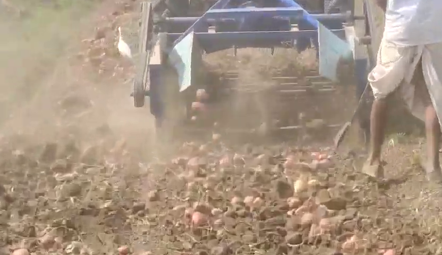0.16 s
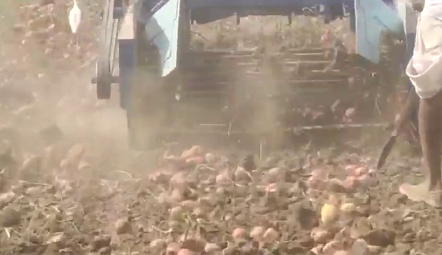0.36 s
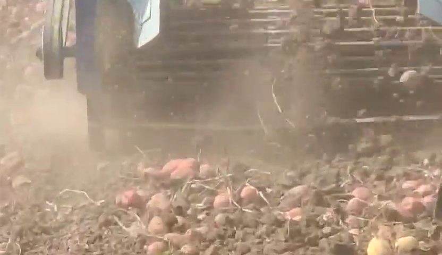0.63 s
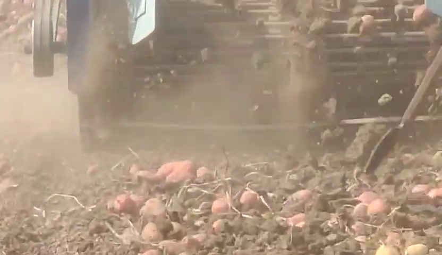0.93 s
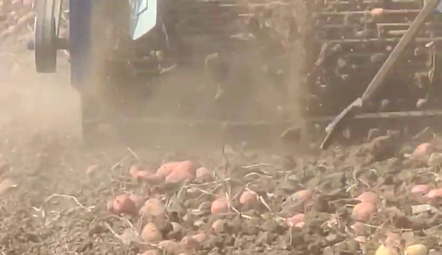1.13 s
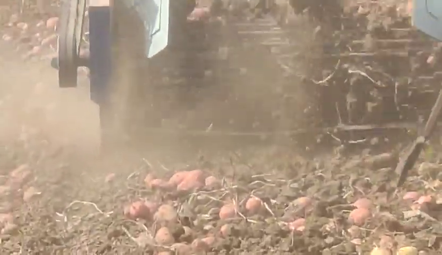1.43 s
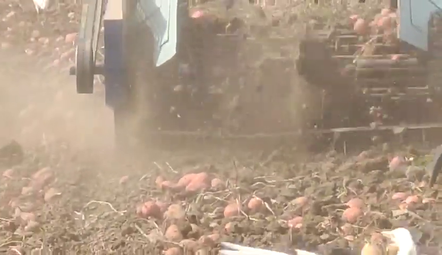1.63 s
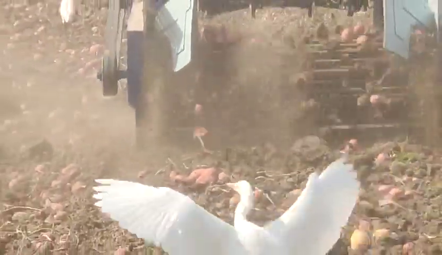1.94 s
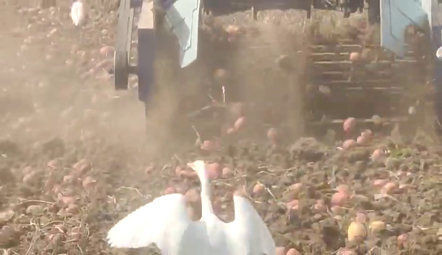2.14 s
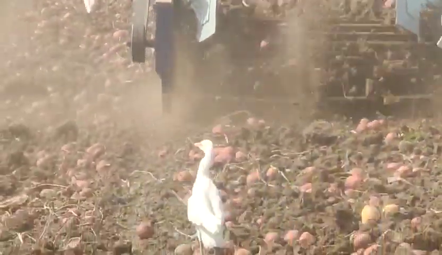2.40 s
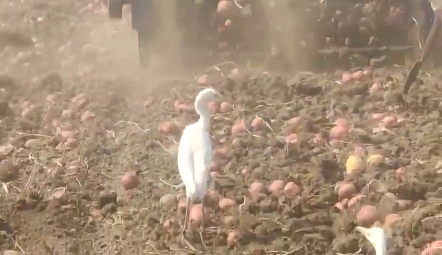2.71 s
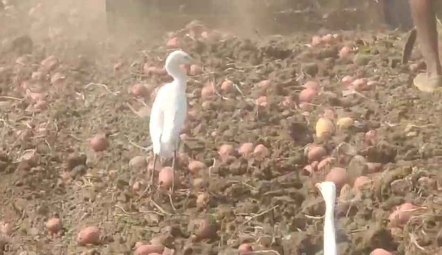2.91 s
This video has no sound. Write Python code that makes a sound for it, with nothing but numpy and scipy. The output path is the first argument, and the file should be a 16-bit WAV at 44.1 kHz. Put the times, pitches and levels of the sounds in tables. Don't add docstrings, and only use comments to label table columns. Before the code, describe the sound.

A tractor and potato digger rumble steadily with rattling metal rods, soil hiss and wind bumps.

```python
import sys
import numpy as np
from scipy import signal
from scipy.fft import rfft, irfft
from scipy.io import wavfile
from scipy.ndimage import uniform_filter1d

SR = 44100
rng = np.random.default_rng(int(sys.argv[2]) if len(sys.argv) > 2 else 0)


def store_pcm(level_fs):
    pcm = np.round(np.clip(level_fs, -1, 1) * 32767).astype(np.int16)
    wavfile.write(sys.argv[1], SR, np.atleast_2d(pcm).T)


def invert_db(x):
    u = np.asarray(x, float) / 20
    return 10 ** u


N = 134946


def noise():
    return rng.standard_normal(N)


def evened(x):
    return x / np.sqrt(np.mean(x ** 2) + 1e-20)


def read(points, hz):
    f, value = np.transpose(points)
    return np.interp(np.log(hz + 1), np.log(f + 1), value)


def curve(rows, axis):
    rows = np.array(rows)
    return np.interp(np.arange(N) / SR, rows[:, 0], rows[:, axis])


def coloured(x, points):
    hz = np.fft.rfftfreq(x.shape[-1], 1 / SR)
    inside = (hz >= points[0][0]) * (hz <= points[-1][0])
    return irfft(rfft(x) * invert_db(read(points, hz)) * inside, x.shape[-1])


def band(x, lo_hz, hi_hz):
    return signal.sosfilt(signal.butter(2, [lo_hz, hi_hz], "bandpass", fs=SR, output="sos"), x)


def slow(top_hz):
    hz = np.fft.rfftfreq(N, 1 / SR)
    return evened(irfft(rfft(noise()) * np.exp(-(hz / top_hz) ** 2) * (hz > 0), N))


def patchy(patchy_db, flicker_db):
    z = signal.stft(noise(), nperseg=256)[2]
    patches = uniform_filter1d(rng.standard_normal(z.shape), size=4, axis=0)
    patches = evened(uniform_filter1d(patches, size=12, axis=1))
    flicker = evened(uniform_filter1d(rng.standard_normal(z.shape[1]), size=5))
    return signal.istft(z * invert_db(patchy_db * patches + flicker_db * flicker), nperseg=256)[1][:N]


# (time [s], firing cycle [Hz])
SPEED = [
    (0.0, 36.24),
    (0.09, 35.77),
    (3.06, 35.91),
]
# (time [s], bass opening [dB], rumble below it [dB])
OPENING = [(0, -42, -37), (.11, -59.5, 14), (.24, -46, -30), (.42, -40, -14.5), (.54, -26.5, -18),
           (.64, -37.5, -9.5), (.71, -32.5, -17.5), (.8, -40.5, -10), (1.06, -33, -21), (1.14, -37, -10.5),
           (1.26, -33.5, -21), (1.36, -41.5, -15.5), (1.95, -42.5, -20.5), (2.08, -37.5, -20),
           (2.55, -37.5, -19.5), (3.06, -40, -23)]
# (multiple of the cycle [1], level [dB])
LOW_ORDERS = [(1, -17.5), (2, 1), (3, -4.5), (4, -38), (5, -28)]
# (multiple of the cycle [1], level [dB])
PIPE_ORDERS = [(8.65, -71.5), (10, -78), (13, -73.5), (14, -70.5), (10, -77.5), (16, -71), (22, -76)]
# (time [s], left-right [dB])
LEAN = [
    (1.3, 2),
    (1.42, -12),
    (1.62, -1.5),
    (1.9, -5),
    (2.15, -4.5),
    (2.25, 4.5),
    (2.5, 1),
    (3.06, 0.5),
]
# (frequency [Hz], density [dB per Hz])
RUMBLE = [(110, -10), (130, 0), (185, -3), (215, -18), (300, -30)]


def exhaust():
    lag_turns, wobble_db, wobble_hz = 0.1183, 1, 7.6
    turns = np.cumsum(curve(SPEED, axis=1)) / SR
    lean = curve(LEAN, axis=1) * np.array([[.5], [-.5]])
    low = 0
    for k, db in LOW_ORDERS:
        level = invert_db(db + wobble_db * slow(wobble_hz) + lean * (k == 2))
        low = low + level * np.cos(2 * np.pi * (k * turns + lag_turns * k * k))
    rumble_level = invert_db(curve(OPENING, axis=2) + 1.5 * slow(17.0))
    low = low + rumble_level * evened(coloured(noise(), RUMBLE))
    pipe = 0
    for k, db in PIPE_ORDERS:
        pipe = pipe + invert_db(db + 2.56 * slow(3.8)) * np.cos(2 * np.pi * (k * turns + rng.random()))
    return np.sqrt(2) * (invert_db(curve(OPENING, axis=1)) * low + pipe), turns


# (time [s], level [dB])
LOAD = [
    (0.0, -55),
    (1.45, -57),
    (1.85, -57),
    (2.3, -58.5),
    (2.79, -57),
    (3.06, -54),
]
# (frequency [Hz], density [dB per Hz])
BODY = [(120, -8), (200, -5.5), (245, -11.5), (356, -13), (720, -3), (1270, -15), (2210, -11),
        (2560, -22.5), (3000, -39), (3900, -21), (6600, -120)]
# (frequency [Hz], density [dB per Hz])
AIR = [(1590, -45), (2700, -1.5), (3000, -1), (3780, 2), (5000, -0.5), (5880, -4.5), (6600, -18),
       (8580, -75), (14500, -120)]
# (frequency [Hz], density [dB per Hz])
FIZZ = [(3880, -44), (6600, -7), (7530, 2.5), (9500, -7), (11300, 0), (12000, -4.5), (12900, -13),
        (14500, -5), (15500, -12)]


def wash(turns):
    body_db, air_db, dust_db = -53.5, -66, -72.5
    body_follow, air_follow, chuff = 0.99, 0.34, 0.14
    load = curve(LOAD, axis=1)
    load = load - load.mean()
    roar = evened(coloured(patchy(patchy_db=1.4, flicker_db=0.45), BODY))
    roar = roar * (1 + chuff * np.cos(2 * np.pi * turns))
    sand = patchy(patchy_db=-0.5, flicker_db=1.5)
    hiss = invert_db(air_db) * evened(coloured(sand, AIR)) + invert_db(dust_db) * evened(coloured(sand, FIZZ))
    return invert_db(body_db + body_follow * load) * roar + invert_db(air_follow * load) * hiss


def rattle():
    rate_per_s, level_db, spread_db = 300, -63, 1.5
    knock = rng.random(N) < rate_per_s / SR * invert_db(2.5 * slow(12.0))
    size = invert_db(spread_db * np.minimum(rng.exponential(1, N), 3)) * knock
    which, t, out = rng.integers(0, 24, N), np.arange(1500) / SR, np.zeros(N)
    shape = invert_db(-60 * t / 0.044) * np.minimum(t / 0.00043, 1)
    for k, hz in enumerate(np.geomspace(900, 5000, 24)):
        tick = band(rng.standard_normal(1500), hz * 0.906, hz * 1.17) * shape
        out += signal.oaconvolve(size * (which == k), tick)[:N]
    colour = [(600, 0.5), (2450, 11.5), (2700, -31), (3800, -12), (5800, 3.0), (6600, -14)]
    return invert_db(level_db) * evened(coloured(out, colour))


# (time [s], peak level [dB], pitch [Hz], brightness [dB], length [s])
CLANKS = [(.285, -36, 2367, -20, 0.0052), (.332, -37.5, 2385, -14, 0.0099), (.482, -44, 2454, -31, 0.01),
          (.662, -42.5, 2460, -21, 0.0066), (.672, -37.5, 2337, -13.5, 0.0021), (.679, -44, 2310, -12, .01),
          (.7355, -35.5, 2356, -15, 0.0046), (.748, -40.5, 2362, -19.5, 0.0049),
          (.762, -37.5, 2173, -34, 0.0038), (.787, -45, 2200, -18, .003), (.899, -41.5, 2216, -12.5, 0.013),
          (1.155, -46.5, 2306, -10, 0.013), (1.262, -41, 2150, -16, 0.02),
          (1.6175, -40.5, 2430, -10.5, 0.0022), (1.793, -51.5, 2290, -8, 0.017),
          (1.877, -37.5, 809, -30, 0.0029), (2.585, -47, 1914, -18, .003),
          (2.593, -43.5, 2044, -10, 0.0039), (2.61, -45, 2064, -18, 0.0037), (2.621, -50, 2180, -24, .003),
          (2.825, -44, 2140, -20, 0.0047), (2.924, -43, 2033, -5, 0.0072), (3.016, -39.5, 2040, -12, .005),
          (3.033, -45, 2056, -13, .004)]
# (time [s], peak level [dB], brightness [dB])
MORE_CLANKS = [
    (0.0757, -42.5, -12.5),
    (0.1865, -42.5, -16.5),
    (0.2428, -44.5, -13.5),
    (0.8445, -43, -15),
    (1.5758, -47.5, -13),
    (1.9305, -47.5, -8),
    (2.4144, -50.5, -11),
    (2.8544, -47.5, -5.5),
]
# (ratio to pitch [1], level [dB])
ROD_RATIOS = [(.73, -16), (.9, -9), (1.0, 0), (1.045, -12)]


def clanks():
    common_hz, common_length_s = 2370, 0.0037
    rise_s, rise_share, ring_t60, scrape_t60 = 0.00073, .15, 0.1, 0.065
    t, out = np.arange(6000) / SR, np.zeros(N + 6000)
    rows = list(CLANKS) + [(s, db, common_hz, bright_db, common_length_s) for s, db, bright_db in MORE_CLANKS]
    chance = rng.random((len(rows), len(ROD_RATIOS)))
    scrape = evened(coloured(noise(), AIR)) + invert_db(-17.5) * evened(coloured(noise(), FIZZ))
    scrape = scrape * invert_db(1.5 * slow(170.0))
    grit = evened(band(noise(), 1220, 1820))
    chatter = .95 + .1 * slow(90.0)
    for (s, db, hz, bright_db, length), luck in zip(rows, chance):
        at = round(s * SR)
        late = np.maximum(t - length, 0)
        rise = np.minimum(t / (rise_s + rise_share * length), 1)
        ring = 0
        for (ratio, ratio_db), u in zip(ROD_RATIOS, luck):
            mode_hz = hz * ratio * (.99 + 0.0241 * u)
            ring = ring + invert_db(ratio_db) * np.sin(2 * np.pi * (mode_hz * t + u))
        ring = invert_db(-9.0 - 60 * late / ring_t60) * ring * np.roll(chatter, -at)[:6000]
        rough = invert_db(-15.5) * np.roll(grit, -at)[:6000]
        rough = rough + invert_db(bright_db - 4.0) * np.roll(scrape, -at)[:6000]
        out[at:at + 6000] += invert_db(db) * rise * (ring + rough * invert_db(-60 * late / scrape_t60))
    return out[:N]


# (time [s], peak level [dB], pitch [Hz])
PINGS = [(0.0756, -43.5, 4360), (0.1859, -47, 3460), (0.3315, -43.5, 3880), (0.3754, -47, 3540),
         (0.4887, -52, 4150), (0.6219, -46.5, 4360), (0.6728, -48, 4450), (0.6854, -47, 3870),
         (0.7361, -45.5, 3480), (0.7434, -48, 3800), (0.8973, -46, 3890), (0.9114, -47, 3217),
         (1.2041, -42.5, 3690), (1.2405, -42.5, 3800), (1.4172, -48.5, 5400), (1.4284, -44, 3810),
         (1.5782, -50, 4760), (1.6002, -47, 3820), (1.6166, -40, 3940), (1.6644, -52, 3400),
         (1.7927, -47.5, 3800), (1.8142, -46.5, 4850), (1.915, -49.5, 4840), (2.0337, -49, 4220),
         (2.2676, -45, 4400), (2.4118, -47.5, 4640), (2.593, -45.5, 4070), (2.6054, -47, 3610),
         (2.8149, -43, 3930), (2.8548, -42.5, 3294), (2.9122, -42.5, 3910), (2.9276, -42, 6070),
         (3.0159, -44.5, 3580), (3.0274, -49.5, 4200)]


def pings():
    ring_t60, crack_t60, crack_db, level_db = 0.034, 0.025, -1, -7.5
    t, out = np.arange(3000) / SR, np.zeros(N + 3000)
    grit = evened(band(noise(), 1900, 7400))
    for s, db, hz in PINGS:
        at = round(s * SR)
        ring = np.sin(2 * np.pi * hz * t) + 0.48 * np.sin(2 * np.pi * 1.23 * hz * t)
        ring = ring * invert_db(-60 * t / ring_t60)
        crack = invert_db(crack_db - 60 * t / crack_t60) * np.roll(grit, -at)[:3000]
        out[at:at + 3000] += invert_db(db + level_db) * np.minimum(t / 0.0024, 1) * (ring + crack)
    return out[:N]


# (middle time [s], level [dB], pitch [Hz], half length [s])
THUDS = [(0.054, -45, 109.4, 0.032), (.105, -48.5, 184, 0.03), (.33, -57, 170, 0.044),
         (.97, -42, 170, 0.041), (1.44, -63, 185, 0.025), (1.52, -50.5, 183, 0.053),
         (1.62, -51, 185, 0.033), (1.76, -50, 172, 0.057), (1.95, -56.5, 259.6, 0.025),
         (2.15, -43, 172, .04), (2.22, -55, 200, 0.03), (2.37, -43.5, 177, 0.052), (2.73, -49, 181, 0.072),
         (2.83, -44, 166, .035), (2.91, -51, 193, 0.035), (3.05, -52, 177, .03)]


def thuds():
    t, out = np.arange(N) / SR, np.zeros(N)
    for s, db, hz, length in THUDS:
        swell = np.cos(np.pi / 2 * np.clip((t - s) / length, -1, 1)) ** 2
        bump = np.sin(2 * np.pi * hz * (t - s) * (1 - 1.5 * (t - s)))
        out += invert_db(db) * np.sqrt(2) * swell * bump
    return out


# (time [s], hold [s], t60 [s])
SNAP = (1.301, .012, .07)


def snap():
    s, hold, t60 = SNAP
    t = np.arange(N) / SR - s
    shape = np.clip(t / 0.003, 0, 1) * invert_db(-60 * np.maximum(t - hold, 0) / t60)
    colour = [(3000, 2), (5000, 5.5), (8000, -4), (10500, -3), (12800, -6), (14700, -13), (15400, -14)]
    spray = evened(coloured(noise(), colour))
    ring = sum(invert_db(db) * np.sin(2 * np.pi * hz * t) for hz, db in [(10430, -11.5), (14700, -18)])
    return invert_db(-56) * shape * (spray + ring)


# (frequency [Hz], level [dB])
PORT_SIDE = [(300, -19), (750, -17), (1500, -14), (2300, -7), (2850, 6.5), (4000, -5.5), (6500, 1),
             (12000, 2)]
# (frequency [Hz], share [0-1])
PORT_LINKED = [(300, .3), (1400, .4), (2400, .68), (4400, .45), (8000, .35), (15000, .2)]
# (frequency [Hz], left-right [dB])
PORT_LEAN = [(0, 17), (700, -.5), (1300, 0), (2380, -1.5), (4400, 4.5), (7500, -2), (12000, -1),
             (22050, 10)]


def ports(x):
    hz, _, z = signal.stft(x, SR, nperseg=256)
    spread = 0.88 * np.exp(2j * np.pi * rng.random(z.shape))
    linked = read(PORT_LINKED, hz)[:, None]
    z = z * invert_db(read(PORT_SIDE, hz))[:, None] * (-1j * linked + np.sqrt(1 - linked ** 2) * spread)
    side = signal.istft(z, SR, nperseg=256)[1][:N]
    return np.array([coloured(x + k * side, [(f, k * db / 2) for f, db in PORT_LEAN]) for k in (1, -1)])


# (frequency [Hz], density [dB per Hz])
WIND = [(12, -39), (20, -8), (48, 0), (72, 4), (113, 1), (203, -13.5), (276, -19.5), (420, -30.5),
        (550, -70), (920, -120)]
# (middle time [s], half length [s], level [dB], left-right [dB], share felt by both ports [0-1])
GUSTS = [(0.027, 0.15, -54, 8, 0.1), (0.1, 0.12, -44.5, -1.5, 0.1), (0.464, 0.03, -33.5, 13.5, 0.68),
         (0.565, 0.1, -42, 5, 0.64), (0.66, 0.084, -43, 10, 0.65), (0.782, 0.071, -43, -13, 0.9),
         (0.983, 0.074, -36, 6, 0.9), (1.08, 0.036, -39, -1, 1), (1.158, 0.042, -45, -9, 0.8),
         (1.31, 0.091, -34, 14.5, 0.17), (1.519, 0.12, -42, -7, 0), (1.924, 0.12, -50.5, -19, 0.7),
         (2.116, 0.15, -43, 2, 0.86), (2.361, 0.18, -43.5, -4, 0.68), (2.433, 0.026, -47, 10, 0)]


def wind():
    breeze_db, lumps_db, breeze_same = -64.5, 7, 0.44
    both, left, right = (evened(coloured(noise(), WIND)) for _ in range(3))
    own, t = np.array([left, right]), np.arange(N) / SR
    lumps = np.array([slow(2.0), slow(7.9)])
    out = invert_db(breeze_db + lumps_db * lumps) * (breeze_same * both + own)
    for s, length, db, pan_db, same in GUSTS:
        swell = np.cos(np.pi / 2 * np.clip((t - s) / length, -1, 1)) ** 2
        level = invert_db(db + np.array([[pan_db / 2], [-pan_db / 2]]))
        out = out + level * swell * (same * both + np.sqrt(1 - same ** 2) * own)
    return out


def scene():
    drone, turns = exhaust()
    digger = wash(turns) + rattle() + clanks() + snap()
    return drone + thuds() + ports(digger + pings()) + wind()


def low_pass(x):
    return signal.sosfilt(signal.butter(12, 15870, fs=SR, output="sos"), x)


def record(dry):
    edge = signal.firwin(511, 15380, window=("kaiser", 9), fs=SR)
    mix = signal.oaconvolve(dry, edge[None], "same")
    return low_pass(mix)


dry = scene()
out = record(dry)
store_pcm(out)
```